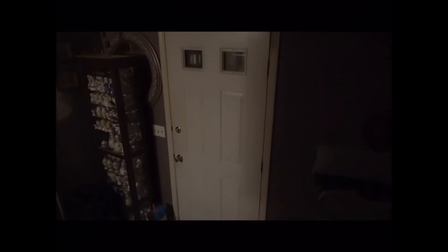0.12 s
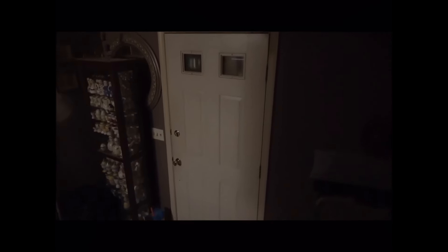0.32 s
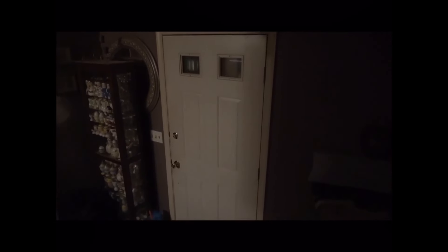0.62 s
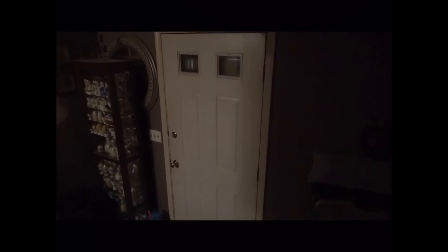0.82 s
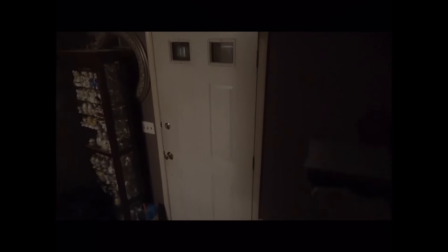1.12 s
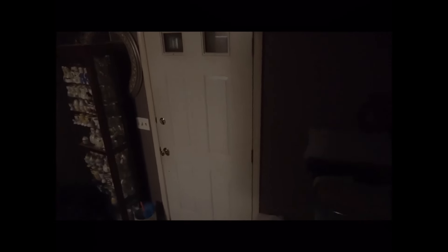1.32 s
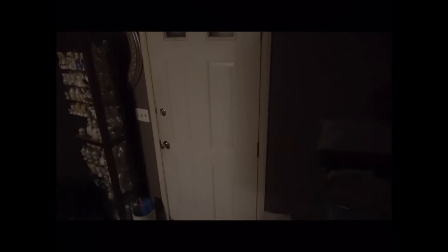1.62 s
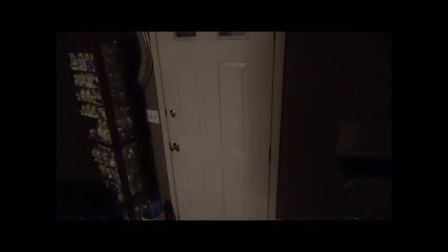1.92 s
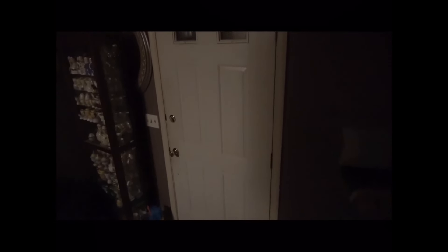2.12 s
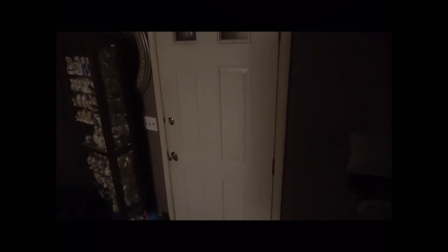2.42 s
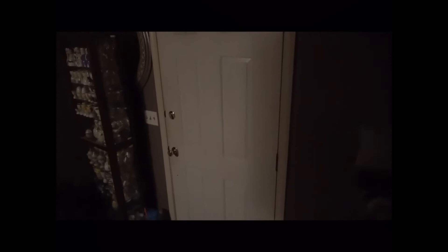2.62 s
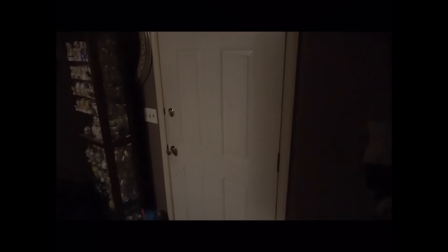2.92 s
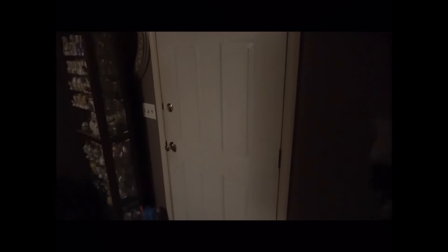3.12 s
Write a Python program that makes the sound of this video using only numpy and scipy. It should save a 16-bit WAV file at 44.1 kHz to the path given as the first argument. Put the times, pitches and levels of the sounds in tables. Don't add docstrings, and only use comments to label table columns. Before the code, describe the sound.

Booming door knocks with barking panels and a loose latch rattle, one ending a set, then three after a pause, over soft room hiss, motor hum and clothes rustle, captured indoors by a hand-held microphone with gain control.

```python
import sys
import numpy as np
from scipy import signal
from scipy.fft import rfft, irfft
from scipy.io import wavfile
from scipy.ndimage import uniform_filter1d, minimum_filter1d, map_coordinates

SR = 44100
rng = np.random.default_rng(int(sys.argv[2]) if len(sys.argv) > 2 else 0)


def boost(x):
    u = np.asarray(x, float) / 20
    return 10 ** u


def inscribe(sig):
    pcm = np.round(np.clip(np.atleast_2d(sig).T, -1, 1) * 32767)
    wavfile.write(sys.argv[1], SR, pcm.astype(np.int16))


N = 143325
EARLY = SR // 2


def unit(x):
    return x / np.sqrt(np.mean(x ** 2) + 1e-20)


def along(points, hz):
    f, v = np.transpose(points)
    return np.interp(np.log(hz + 1), np.log(f + 1), v)


def wobble(rate_hz):
    knots = rng.standard_normal(N // 400 + 4)
    return map_coordinates(knots, [np.arange(N) * rate_hz / SR])


def noise(count, tone, alike, left, t60=None, patchy_db=0):
    hz, t, z = signal.stft(rng.standard_normal((2, count)), SR, nperseg=512)
    turn = np.arccos(np.clip(along(alike, hz), -1, 1))[:, None] / 2
    mid, side = z[0] * np.cos(turn), z[1] * np.sin(turn)
    field = uniform_filter1d(rng.standard_normal(mid.shape), size=5, axis=0)
    field = unit(uniform_filter1d(field, size=10, axis=1))
    gain = boost(along(tone, hz)[:, None] + patchy_db * field)
    lean = boost(along(left, hz)[:, None] / 2)
    pair = gain * np.array([(mid + side) * lean, (mid - side) / lean])
    steady = signal.istft(pair, SR, nperseg=512)[1][:, :count]
    if t60 is None:
        return unit(steady)
    decay = boost(-60 * t / along(t60, hz)[:, None])
    return signal.istft(pair * decay, SR, nperseg=512)[1][:, :count] / steady.std()


def add(out, x, s):
    part = out[:, EARLY + round(s * SR):][:, :x.shape[1]]
    part += x[:, :part.shape[1]]


def ring(hz, db, t60, rise_s, t, phase=0):
    swell = (1 - np.exp(-np.maximum(t, 0) / rise_s)) ** 2
    decay = boost(db[:, None] - 60 * t / t60[:, None])
    return decay * swell * np.sin(2 * np.pi * hz[:, None] * t + phase)


# (frequency [Hz], density [dB per Hz])
AIR_TONE = [(12, -64), (20, -34), (76, 0), (245, -12), (298, -7), (706, -8.5), (1460, -18), (1670, -20.5),
            (15500, -46.5)]
# (frequency [Hz], left-right likeness [0-1])
AIR_ALIKE = [(30, 1), (130, 1), (290, 0.8), (640, 0.91), (1400, 0.96), (3100, 1), (6800, 0.76),
             (14000, 0.28)]
# (frequency [Hz], left-right balance [dB])
AIR_LEFT = [(60, -5), (180, 7.5), (550, -3.5), (1650, -1.5), (4970, -0.5), (15000, 0.0)]
AIR_DB = -48.5


def room_air():
    return boost(AIR_DB + 0.7 * wobble(6)) * noise(N, AIR_TONE, AIR_ALIKE, AIR_LEFT, patchy_db=0.6)


# (frequency [Hz], level [dB rms])
HUM = [(86.1, -75), (118.4, -58.5), (242.2, -63.5), (479.1, -58.5), (597.5, -63), (694.4, -60),
       (1270, -70.5)]
HUM_WAVER_DB = 4


def fridge_hum():
    t = np.arange(N) / SR
    hum = np.zeros(N)
    for hz, db in HUM:
        level = boost(db + 1 + HUM_WAVER_DB * wobble(4.92))
        hum += level * np.sin(2 * np.pi * hz * t + 1.03 * wobble(6.94))
    return hum * boost([[1.2], [-1.2]])


# (time [s], rustle level [dB])
CLOTH = [(0, 1.5), (.4, -18), (.65, -4), (.88, 6), (1.02, 0), (1.15, -4.5), (1.4, 7.5), (1.62, 7.5),
         (1.7, 3.5), (1.79, 6.5), (1.88, -1), (2.3, -2), (2.52, 0.5), (2.72, 5), (3.0, 2.5), (3.25, 0)]
# (frequency [Hz], density [dB per Hz])
CLOTH_TONE = [(590, -25), (1000, -24), (1160, -5), (1270, 7.5), (1480, -9.5), (4100, -12.5), (15500, -21)]
CLOTH_DB = -64.5


def cloth_rustle():
    t = np.arange(N) / SR
    level = boost(CLOTH_DB + np.interp(t, *np.transpose(CLOTH)) + 0.4 * wobble(28.5))
    return level * noise(N, CLOTH_TONE, AIR_ALIKE, AIR_LEFT, patchy_db=0.8)


# (time [s], level [dB], rise [s], t60 [s])
SCUFF = [
    (0.142, -35.5, 0.011, 0.2),
    (1.625, -47, 0.0056, .06),
    (2.351, -44, 0.0017, 0.19),
    (2.648, -55, 0.0027, 0.045),
]
# (frequency [Hz], density [dB per Hz])
SCUFF_TONE = [
    [(530, -40), (900, -4), (1210, -4), (1380, -15.5), (2630, -4), (3760, -10), (7070, -12), (11300, -22.5),
     (15500, -35)],
    [(800, -40), (1400, -2), (1900, 0), (2500, -9), (4000, -10), (9000, -30)],
    [(1760, -17), (3000, -3), (3470, -4.5), (6800, -3.5), (15500, -21)],
    [(710, -32), (1200, 1), (2910, -7), (9000, -19), (11700, -51), (19800, -120)],
]
# (frequency [Hz], left-right likeness [0-1])
KNOCK_ALIKE = [(60, 0.44), (250, 0.98), (640, 1), (1400, 1), (3100, 1), (6800, 0.71), (14000, 0.7)]


def scuffs():
    out, t = np.zeros((2, N + EARLY)), np.arange(SR // 2) / SR
    for (s, db, rise_s, t60), tone in zip(SCUFF, SCUFF_TONE):
        shape = np.minimum(t / rise_s, 1) * boost(-60 * np.maximum(t - rise_s, 0) / t60)
        add(out, boost(db) * shape * noise(len(t), tone, KNOCK_ALIKE, [(1000, 0.7)], patchy_db=1.2), s)
    return out[:, EARLY:]


# (frequency [Hz], level [dB], t60 [s])
LATCH = [(2560, 0, .07), (3150, -1, .07), (4500, -8, .06), (7100, -6, .05)]
LATCH_S, LATCH_DB, LATCH_RISE_S = 0.149, -40.5, 0.0026


def latch_ring():
    out, t = np.zeros((2, N + EARLY)), np.arange(SR // 2) / SR
    modes = ring(*np.transpose(LATCH), LATCH_RISE_S, t)
    add(out, boost(LATCH_DB) * np.ones((2, len(LATCH))) @ modes, LATCH_S)
    return out[:, EARLY:]


FRAME_DB, FRAME_HZ, FRAME_T60_S = -14, 160, 0.08


def frame_push(t, lead_s):
    decay = boost(FRAME_DB - 60 * t / FRAME_T60_S)
    return decay * np.sin(2 * np.pi * FRAME_HZ * t) * np.minimum(t / lead_s, 1)


# (frequency [Hz], density [dB per Hz])
RATTLE_TONE = [(1290, -10), (2200, -4), (3590, -7.5), (4160, -9.5), (7320, -14.5), (8270, -18),
               (13800, -21.5), (15500, -33)]
# (frequency [Hz], left-right balance [dB])
KNOCK_LEFT = [(60, 1.5), (180, 4.5), (550, 3.0), (1650, 0.5), (4970, 0.5), (15000, 1.0)]
# (frequency [Hz], t60 [s])
ROOM_T60 = [(200, 0.29), (600, 0.3), (1200, 0.31), (2500, 0.26), (6000, 0.32), (14000, 0.23)]
RATTLE_DB = -20.5


def rattle_burst():
    return boost(RATTLE_DB) * noise(SR, RATTLE_TONE, KNOCK_ALIKE, KNOCK_LEFT, ROOM_T60, patchy_db=1)


# (frequency [share of centre], density [dB per Hz])
THUMP_TONE = [(.1, -40), (.4, -8), (.75, -5.5), (1.02, -6), (1.3, -7), (1.9, -25.5), (4, -68)]
THUMP_DB, THUMP_RISE_S = -5.5, 0.015
GRAIN_DB = 1.2


def leaf_thump(t, centre_hz):
    tone = np.multiply(THUMP_TONE, [centre_hz, 1])
    thump = noise(SR, tone, KNOCK_ALIKE, KNOCK_LEFT, ROOM_T60, GRAIN_DB)
    return boost(THUMP_DB) * thump * (1 - np.exp(-t / THUMP_RISE_S))


# (frequency [Hz], level [dB], t60 [s])
PANEL = [(764, -16.5, 0.93), (854, -13.5, 0.44), (1083, -3.5, 0.098), (1175, -2.5, 0.46), (1504, -35, 0.75),
         (1400, -33, 0.61), (1663, -14, 0.46), (1850, -17, 0.39), (2000, -25, 0.46), (2010, -23, 0.12)]
PANEL_DB, PANEL_SPREAD_DB = -12, 3.5
PANEL_RISE_S, PANEL_LONGEST_S = 0.0015, 0.26
PANEL_DRIFT = 0.022


def panel_modes(t):
    hz, db, t60 = np.transpose(PANEL)
    drift, spread, phase = rng.standard_normal((3, len(hz)))
    t60 = np.minimum(t60, PANEL_LONGEST_S)
    modes = ring(hz * (1 + PANEL_DRIFT * drift), db, t60, PANEL_RISE_S, t, np.pi * phase[:, None])
    return boost(PANEL_DB) * boost(PANEL_SPREAD_DB * np.array([spread, -spread])) @ modes


# (frequency [Hz], density [dB per Hz])
BARK_TONE = [(350, -13), (600, 0), (730, -15.5), (801, -5), (980, -3.5), (1220, 2), (1320, 0),
             (2600, -23.5), (3380, -35), (5720, -120)]
BARK_DB = -3


def panel_bark(t):
    dense = noise(SR, BARK_TONE, KNOCK_ALIKE, KNOCK_LEFT, ROOM_T60, GRAIN_DB)
    return panel_modes(t) + boost(BARK_DB) * dense


# (frequency [Hz], level [dB], t60 [s], left-right balance [dB])
BOOM = [(84.1, 2.5, 0.3, -1), (98, -19, 0.75, -21), (126, -5, 0.69, 1.5), (153.6, 0, 0.45, 3.5),
        (214.7, -0.5, 0.25, 9), (243.8, -6.5, 0.43, 1.5), (260.4, -1.5, 0.13, 5), (327.8, -6.5, .3, 3.5),
        (440.3, -12, 0.19, -0.5), (565, -16.5, 0.18, 14.5), (669, -13, 0.26, 4)]
BOOM_RISE_S, BOOM_SCATTER_DB = 0.024, 1.34


def door_boom(t):
    hz, db, t60, left_db = np.transpose(BOOM)
    db = db + BOOM_SCATTER_DB * rng.standard_normal(len(hz))
    return boost([left_db / 2, -left_db / 2]) @ ring(hz, db, t60, BOOM_RISE_S, t)


# (time [s], strength [dB], bark [dB], rattle [dB])
KNOCKS = [
    (-.21, -16.5, 0, 4),
    (.243, -14.5, 4.5, 2.5),
    (1.914, -14.5, 2, 3),
    (2.327, -13, -2.5, 0.5),
    (2.787, -13.5, 2, 5),
]
# (lead through frame [s], thump [dB], thump centre [Hz], left-right balance [dB])
CONTACT = [
    (0.0083, 0, 400, 2),
    (.011, 2.5, 600, 1),
    (.007, 5, 410, 1.5),
    (.012, 7.5, 390, 1),
    (.014, 6.5, 296, 1),
]
LEAD_DB, ARRIVE_S = -14, 0.0018
RATTLE_RISE_S, DIRECT_SHARE = 0.012, 0.8
DUCK_DB, DUCK_S = 5.5, 0.08


def knocks():
    out, t = np.zeros((2, N + EARLY)), np.arange(SR) / SR
    for (s, strength_db, bark_db, rattle_db), contact in zip(KNOCKS, CONTACT):
        lead_s, thump_db, thump_hz, pan_db = contact
        after = t - lead_s
        air = 0.5 + 0.5 * np.tanh(after / ARRIVE_S)
        arrive = air + (1 - air) * boost(LEAD_DB) * np.minimum(t / lead_s, 1)
        crack = air * (1 - (1 - DIRECT_SHARE) * np.exp(-np.abs(after) / RATTLE_RISE_S))
        blow = door_boom(after)
        blow += arrive * boost(bark_db) * panel_bark(t)
        blow += arrive * boost(thump_db) * leaf_thump(t, thump_hz)
        blow += crack * boost(rattle_db) * rattle_burst()
        blow *= boost(-DUCK_DB * np.clip(1 - after / DUCK_S, 0, 1))
        blow += frame_push(t, lead_s)
        pan = boost([[pan_db / 2], [-pan_db / 2]])
        add(out, boost(strength_db) * pan * blow, s - lead_s)
    return out[:, EARLY:]


def scene():
    house = room_air() + fridge_hum() + cloth_rustle()
    return house + scuffs() + latch_ring() + knocks()


def roll_off(x):
    return signal.sosfilt(signal.butter(12, 15670, fs=SR, output="sos"), x)


CEILING_DB, SQUEEZE = -9, 0.47
GAIN_HOLD_S, GAIN_SMOOTH_S = 0.0057, 0.006
TOP_HZ = 15650


def record(dry):
    over_db = np.maximum(20 * np.log10(np.abs(dry).max(0) + 1e-9) - CEILING_DB, 0)
    hold, smooth = round(GAIN_HOLD_S * SR), round(GAIN_SMOOTH_S * SR)
    held_db = minimum_filter1d(-SQUEEZE * over_db, size=hold, origin=(hold - 1) // 2)
    wet = dry * boost(uniform_filter1d(held_db, size=smooth))
    wet = irfft(rfft(wet) * (np.fft.rfftfreq(N, 1 / SR) < TOP_HZ), N)
    return roll_off(wet)


dry = scene()
out = record(dry)
inscribe(out)
```